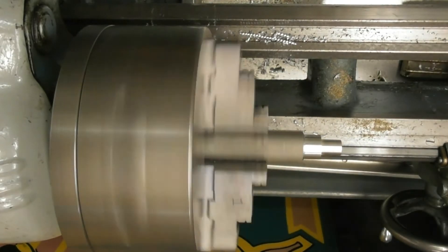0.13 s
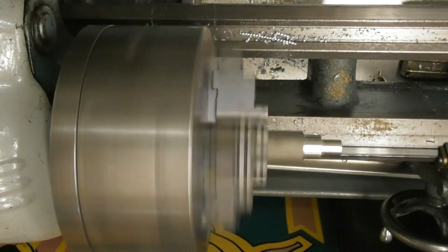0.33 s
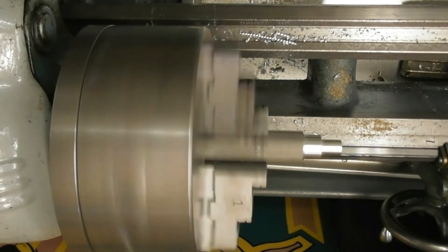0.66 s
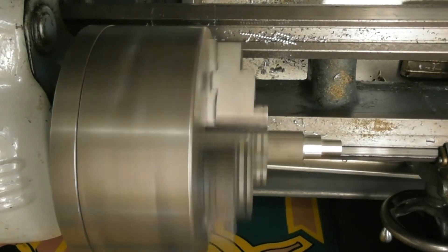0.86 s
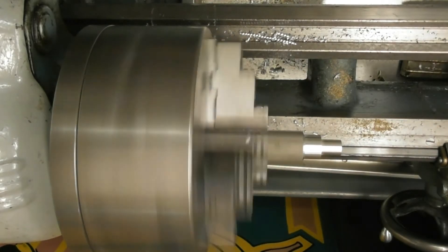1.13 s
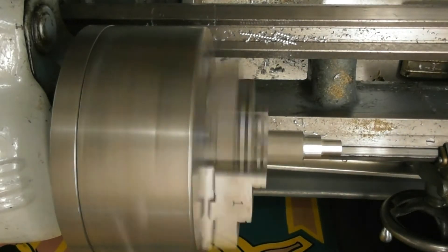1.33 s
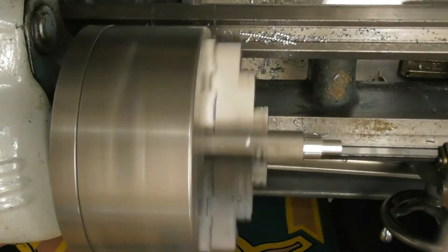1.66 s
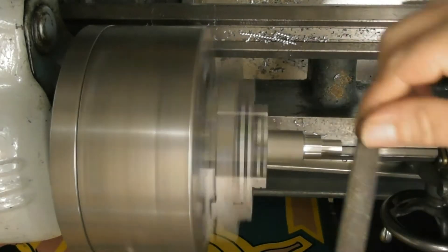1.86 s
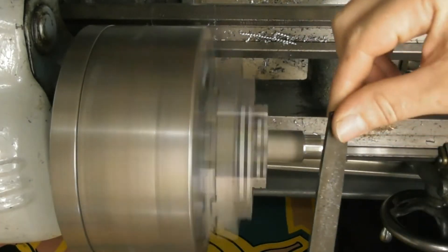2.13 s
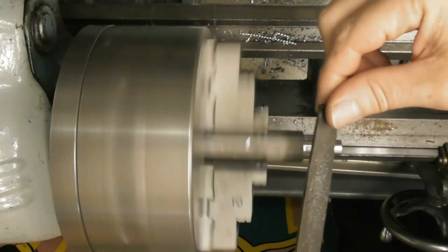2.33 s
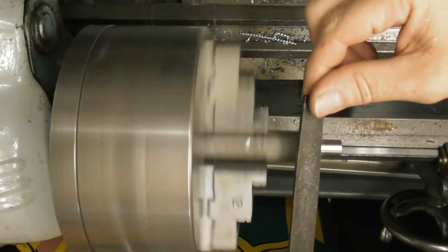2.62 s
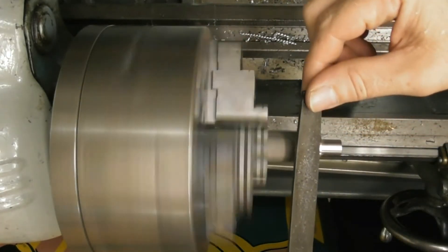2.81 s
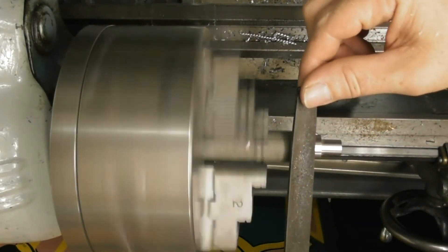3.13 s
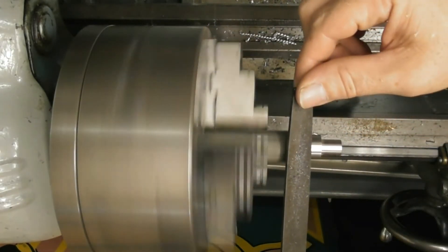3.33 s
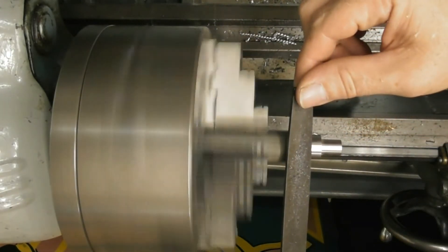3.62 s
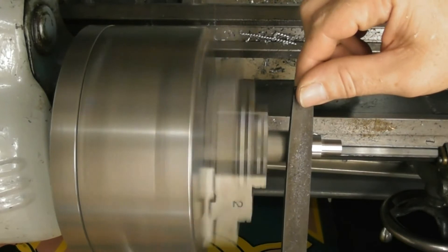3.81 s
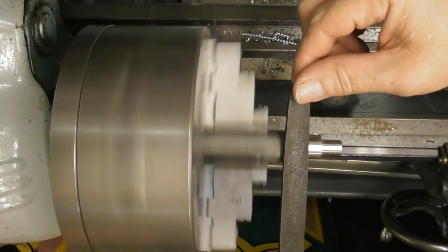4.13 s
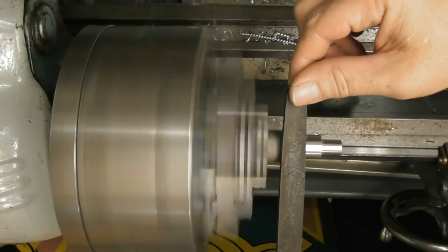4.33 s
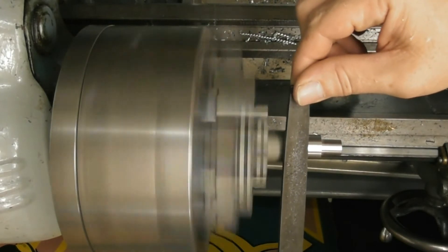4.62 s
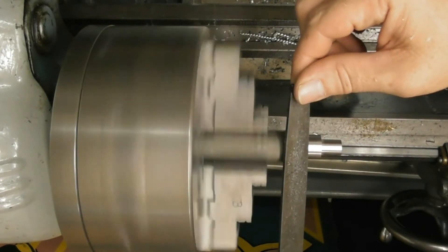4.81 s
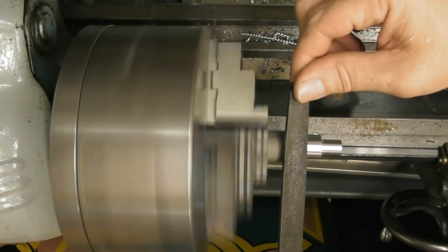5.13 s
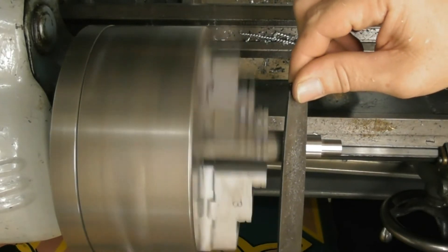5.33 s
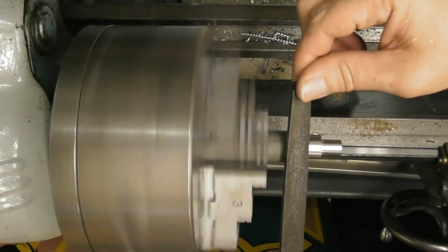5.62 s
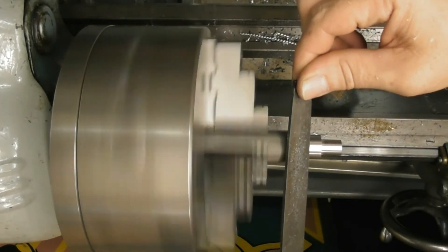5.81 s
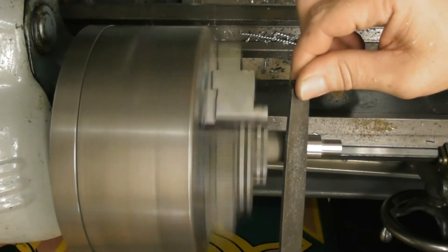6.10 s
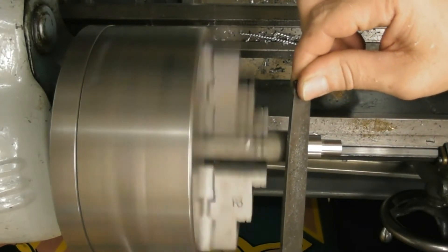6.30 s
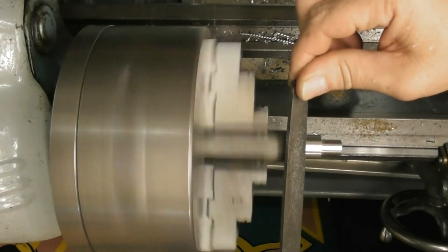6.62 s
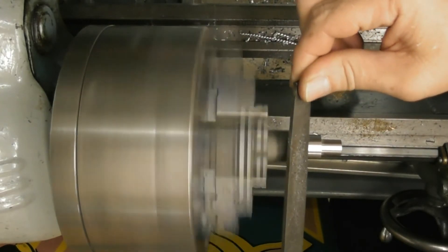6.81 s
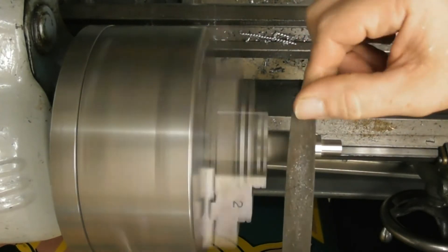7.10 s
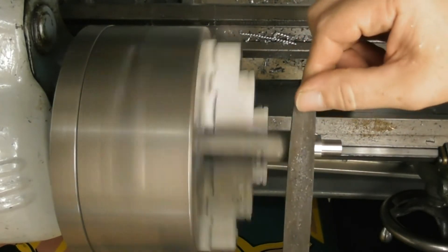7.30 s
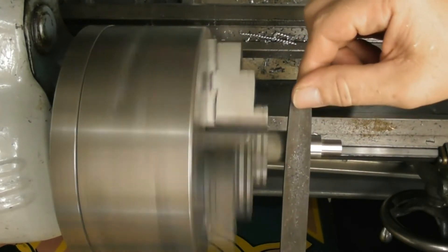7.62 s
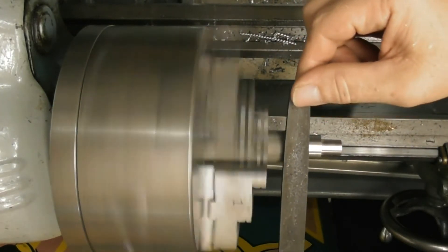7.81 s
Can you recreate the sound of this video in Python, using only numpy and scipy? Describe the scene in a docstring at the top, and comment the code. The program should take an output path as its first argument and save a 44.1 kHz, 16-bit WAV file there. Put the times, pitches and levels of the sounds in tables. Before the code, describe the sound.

Steady low lathe hum with faint soft swishes at first; midway a file rasps and pings rapidly on spinning metal, stops, then touches again.

```python
"""A hand file is laid on work spinning in a metal lathe, lifted and laid on again: each high spot bites into the
teeth, makes the blade ping and drags a short rasp behind it, early or late as the hand sways. Bursts and uneven
noise excite resonators that stand for blade and work. Below runs the lathe: a throbbing mains hum and gear whine
made of sines, and bearing noise made of filtered noise. A few soft swishes of coloured noise come from beside it."""
import sys
import numpy as np
from scipy import signal
from scipy.fft import rfft, irfft, next_fast_len
from scipy.io import wavfile
from scipy.ndimage import uniform_filter1d, map_coordinates

SR = 44100
rng = np.random.default_rng(int(sys.argv[2]) if len(sys.argv) > 2 else 0)


def digitize_waveform(pressure):
    """Quantize a signal to 16-bit integers and store it at the path in sys.argv[1].

    Rows of a 2-D input are taken as channels; values are limited to [-1, 1].
    """
    field = np.atleast_2d(pressure).T
    bounded = np.clip(field, -1, 1)
    quanta = np.round(bounded * 32767).astype(np.int16)
    wavfile.write(sys.argv[1], SR, quanta)


N = 350595

MAINS_HUM_HZ = 120.03
BITE_HZ = 45.45  # passes of a high spot under the file each second


def undb(db):
    """Amplitude ratio of a level in decibels."""
    return 10 ** (np.asarray(db) / 20)


def unit(x):
    """Normalisation to a root mean square of 1."""
    return x / np.sqrt(np.mean(np.abs(x) ** 2) + 1e-20)


def clock():
    """Sampling instants in seconds."""
    return np.arange(N) / SR


def curves(table):
    """Linear interpolation in time of each column of a table."""
    times_s, *columns = np.transpose(table)
    return [np.interp(clock(), times_s, column) for column in columns]


def padded():
    """Even length of the spectra, with half a second to spare for ringing."""
    return next_fast_len(N + SR // 2) // 2 * 2


def bins():
    """Frequency of every spectral bin (Hz), at least 1."""
    return np.maximum(np.arange(padded() // 2 + 1) * SR / padded(), 1)


def over_hz(table, hz):
    """Linear interpolation over log frequency of each column of a table."""
    table_hz, *columns = np.transpose(table)
    return [np.interp(np.log(hz), np.log(table_hz), column) for column in columns]


def colour(table):
    """Minimum-phase response with a given (Hz, dB) outline, by folding the cepstrum onto positive time."""
    cepstrum = irfft(np.log(undb(over_hz(table, bins())[0])))
    half = len(cepstrum) // 2
    cepstrum[1:half] *= 2
    cepstrum[half:] = 0
    return np.exp(rfft(cepstrum))


def resonances(table):
    """Modal superposition of (Hz, width Hz, dB) resonators; each radiates only near its own pitch."""
    f = bins()
    response = 0
    for hz, width_hz, db in table:
        mode = 1 / (1 + 2j * (f - hz) / width_hz)
        radiation = 1 / (1 + 1j * (f - hz) / (4 * width_hz))
        response = response + undb(db) * mode * radiation
    return response


def through(x, response):
    """Linear filtering: the spectrum of the signal times a frequency response."""
    return irfft(rfft(x, padded()) * response)[:N]


def walk(rate):
    """Random modulation of rms 1: levels held for 1 / rate seconds and smoothed twice over that time."""
    hold = max(int(SR / rate), 1)
    steps = np.repeat(rng.standard_normal(N // hold + 1), hold)
    return unit(uniform_filter1d(uniform_filter1d(steps, hold), hold)[:N])


def gate(start, end, fade):
    """Trapezoidal window: 1 between two times, with linear slopes outside them."""
    return np.clip(np.minimum(clock() - start, end - clock()) / fade + 1, 0, 1)


def burst(age, length):
    """Fourth-power exponential pulse: nearly flat within its length, then a quick fall."""
    return np.exp(-(age / length) ** 4)


def grit(spread_db):
    """Impulsive noise of rms 1: dense tooth clicks of very uneven size."""
    return unit(rng.standard_normal(N) * undb(spread_db * walk(5000)))


def bent(x, share):
    """Doppler-like bending: the reading time wavers by a share of the time between passes."""
    shift = share * SR / BITE_HZ * walk(BITE_HZ)
    return map_coordinates(x, [np.arange(N) + shift], order=5, mode="nearest")


def ports(x, scatter_db):
    """Interaural-style level and phase differences at two close microphone ports, plus machine reflections."""
    # the unrelated share is scaled by scatter_db
    # columns: pitch_hz, left_minus_right_db, left_lead_rad, unrelated_share_db
    port_table = [(60.3, 0, 0.1, -16.5), (123, -1.2, 0.057, -27), (223, -1.8, 0.053, -16.5),
                  (367, -4, 0.63, -20), (654, -3.5, 0, -5), (1180, 1, 0.46, -12.5),
                  (2480, 0.5, 0.17, -12.5), (6000, 0, 0, -50), (9000, -0.5, 0.13, -10),
                  (14000, -0.5, 0.6, 1.5)]
    balance_db, lead, apart_db = over_hz(port_table, bins())
    lean = undb(balance_db / 2) * np.exp(.5j * lead)
    echoes = rng.standard_normal(N) * np.exp(-clock() / 0.021)
    side = through(x, unit(rfft(echoes, padded())) * undb(apart_db + scatter_db))
    return np.array([through(x, lean) + side, through(x, 1 / lean) - side])


def workshop(x, t60, wet_db):
    """Diffuse reverberation: an exponentially decaying noise tail, independent at each port."""
    tails = rng.standard_normal((2, N)) * undb(-60 * clock() / t60)
    tails = tails * (clock() > .006)  # no reflection comes sooner
    wet = [through(x, rfft(tail, padded()) / np.sqrt(np.sum(tail ** 2))) for tail in tails]
    return undb(wet_db) * np.array(wet)


def swell(db_per_s):
    """Exponential growth: the level rises steadily in decibels, through 0 dB midway."""
    return undb(db_per_s * (clock() - clock().mean()))


def swishes():
    """Friction noise: light, bright sliding with a fine grain, under envelopes that swell and fade."""
    # columns: peak_s, swelling_s, fading_s, level_db
    slides = [(.025, 0.029, 0.053, -52.5), (.165, 0.06, 0.11, -43), (.37, 0.15, 0.08, -46),
              (.59, 0.013, 0.021, -43.5), (.675, 0.1, 0.12, -37.5), (.832, 0.028, 0.12, -48.5)]
    # spectral outline; columns: pitch_hz, relative_db
    slide_colour = [(1500, -38), (2600, -34), (3700, -13), (4800, -18.5), (6300, -10), (7000, -1.5),
                    (8000, -0.5), (9000, -2.5), (11000, -13.5), (12500, -16), (15800, -26)]
    strength = 0
    for peak, rise, fall, db in slides:
        ramp = np.interp(clock(), [peak - rise, peak, peak + fall], [0, 1, 0])
        strength = strength + undb(db) * np.sin(np.pi / 2 * ramp) ** 2
    return strength * unit(through(grit(spread_db=2.5), colour(slide_colour)))


def bearings():
    """Rolling noise rings the housing: the middle churns with each motor turn, the treble buzzes with the mains."""
    # density of bearings, belt and cabinet before the housing rings; columns: pitch_hz, density_db_per_hz
    drive = [(30, -82), (70, -74), (115, -56.5), (165, -64.5), (300, -65.5), (560, -70), (700, -77.5),
             (1150, -76), (1600, -85), (3000, -87.5), (5000, -99), (7000, -92.5), (9200, -97),
             (11500, -107.5), (15500, -114)]
    # headstock and guard resonances, relative to that density; columns: pitch_hz, width_hz, lift_db
    housing = [(224, 3.7, -20.5), (275, 6.1, 1), (1986, 360, -7.5), (3140, 80, -2), (3890, 380, -6),
               (5280, 40, 3.5), (9100, 72, -1), (14100, 170, -3)]
    motor_hz = 29.81
    t, f = clock(), bins()
    churn = 1 + 0.17 * np.sin(2 * np.pi * motor_hz * t) + 0.038 * np.sin(2 * np.pi * 2 * motor_hz * t)
    buzz = 1 + 0.041 * np.sin(2 * np.pi * MAINS_HUM_HZ * t)
    low_share = 1 / (1 + (f / 1100) ** 4)  # share of the power
    body = colour(drive) * (1 + resonances(housing)) * np.sqrt(SR / 2)
    low_noise = rng.standard_normal(N) * churn * undb(.8 * walk(8))
    low = through(low_noise, body * np.sqrt(low_share))
    high_noise = rng.standard_normal(N) * buzz * undb(0.41 * walk(2.48))
    high = through(high_noise, body * np.sqrt(1 - low_share))
    return low * swell(db_per_s=0.23) + high * swell(db_per_s=0.44)


def tone(hz, db, waver, flutter_db):
    """Sinusoid with slight random phase modulation (radians) and level modulation (dB)."""
    phase = 2 * np.pi * (hz * clock() + rng.random()) + waver * walk(6)
    return np.sqrt(2) * undb(db + flutter_db * walk(9)) * np.sin(phase)


def gears():
    """Tooth-mesh tones and interference: two loud meshes and a slow beat over the drive's many weaker tones."""
    # loud gear meshes, lower and upper: mesh_hz, full level_db, start_db relative to it
    mesh_hz, mesh_db, mesh_start_db = (1044.15, 1311.65), (-51, -48), (-10, -2.5)
    # a gear tone, then the third mains harmonic; columns: pitch_hz, relative_db
    beating = [(357.72, -48), (360.09, -46.5)]
    # weaker tones of motor and gear train; columns: pitch_hz, relative_db
    weak_tones = [(135.97, -46.5), (143.44, -46), (149.83, -47), (179.67, -48), (210.26, -56),
                  (240.06, -53.5), (450.35, -62), (480.12, -58.5), (509.96, -55.5), (600.15, -56.5),
                  (715.43, -61.5), (809, -66.5), (953.92, -64), (1071.57, -66), (1430.91, -62.5)]
    mesh_full_s, beat_null_s = 1.9, .245  # meshes at full strength; first cancelling of the beat
    early = np.clip(1 - clock() / mesh_full_s, 0, 1)
    lower_db, upper_db = (db + start_db * np.sqrt(early) for db, start_db in zip(mesh_db, mesh_start_db))
    lower = tone(mesh_hz[0], lower_db, waver=0.3, flutter_db=0.6)
    upper = tone(mesh_hz[1], upper_db, waver=0.052, flutter_db=0.75)
    gear, mains = (undb(db + 0.24 * walk(15)) * np.sin(2 * np.pi * hz * (clock() - beat_null_s))
                   for hz, db in beating)
    beat = np.sqrt(2) * undb(-0.1) * (mains - gear)
    weaker = sum(tone(hz, db + 1.4, waver=0.4, flutter_db=2.5) for hz, db in weak_tones)
    return swell(db_per_s=0.23) * (lower + upper + beat + weaker)


def hum():
    """Magnetic hum under amplitude and phase modulation: the sway of each shaft pinches it once a turn."""
    # unbalanced shafts, main then second; columns: turns_per_s, trough_s
    shafts = [(7.959, .068), (7.444, .099)]
    level_db = -18.5  # rms before the throb, midway through
    main, second = (2 * np.pi * hz * (clock() - trough) for hz, trough in shafts)
    throb = 1 - 0.17 * np.cos(main) - 0.024 * np.cos(2 * main) - .055 * np.cos(second)
    phase = 2 * np.pi * MAINS_HUM_HZ * clock() + 0.16 * np.cos(main) + 0.03 * walk(5.2)
    return np.sqrt(2) * undb(level_db) * swell(db_per_s=0.1149) * throb * np.sin(phase)


def contact():
    """Intermittent contact: whether the file touches, how loosely it lies (0-1), and its rasp (dB)."""
    # columns: laid_on_s, lifted_s, rasp_relative_db
    strokes = np.array([(4.077, 6.725, -41), (7.684, 8.2, -42.5)])
    settle_s, lift_s = 0.13, 0.054
    t = clock()
    midway = (strokes[:-1, 1] + strokes[1:, 0]) / 2  # between one stroke and the next
    start, end, rasp_db = strokes[np.searchsorted(midway, t)].T
    settling = np.exp(-((t - start) / settle_s) ** 4)
    lifting = np.exp(-((t - end) / lift_s) ** 2)
    return gate(start, end, fade=0.0049), np.maximum(settling, lifting), rasp_db


def catches(count):
    """Uneven cutting force: extra bite and extra ping (dB) of the pass that each sample belongs to."""
    # passes with their own catch of the teeth; columns: pass_s, extra_bite_db, extra_ping_db
    caught = [(4.247, 7, -9), (4.269, 9, -2), (4.357, 11.5, 11), (4.423, 6, 0), (4.467, 11.5, 7),
              (4.489, 2, 3), (4.511, 9, -3), (4.533, -1, 2), (4.643, 9.5, 0), (4.709, 3, 0), (4.731, 9, 0),
              (4.753, 9.5, -5), (4.775, 9, -2), (4.797, 8, 1), (4.841, 13, -3), (4.951, 4, 3),
              (4.973, 11, 0), (4.995, 13.5, 0), (5.017, 11, 2), (5.039, 10, -13), (5.281, 10.5, -1),
              (5.303, 13, 3), (5.347, 8.5, 5), (5.611, 1, -8), (5.633, 8.5, -4), (5.743, 3, 0),
              (6.424, 3, -7), (6.492, 1.5, -3), (6.514, 0, 2.5), (6.536, 2.5, -1), (6.58, 3, 1),
              (6.602, 0.5, 0), (6.647, 2, 2), (7.685, 4.5, 0.5), (7.75, 4.5, 2), (7.793, 5.5, 6.5),
              (7.815, 4, 0), (7.947, 1.5, -1)]
    extra = np.zeros((count.max() + 2, 2))
    for s, bite_db, ping_db in caught:
        extra[round(s * BITE_HZ) + 1] = bite_db, ping_db
    return extra[count].T


def blade_ring(bite, rasp):
    """Forced modal vibration: bites and rasp ring the blade, and each hold lifts its modes by its own amounts."""
    # modes, with the lift over the cutting colour in each hold
    # columns: pitch_hz, width_hz, light_filing_db, leaning_in_db, second_stroke_db
    modes = np.array([(2430, 160, -3.5, -2, -7), (2980, 150, 6, 2, 3), (3546, 130, 5.5, 1.5, 6),
                      (3810, 430, 4, 6.5, 1.5), (4450, 210, -2, 2, -5), (5270, 94, -3.5, -4, -9),
                      (6990, 33, 9.5, 8.5, 10), (7434, 200, 11.5, 11, 5.5), (7720, 96, 11.5, 11.5, -6),
                      (8270, 280, 2.5, 2, 1), (8760, 170, 3.5, -4, 5), (8980, 140, 5, 4.5, 5.5),
                      (10360, 230, 4, 4, -5), (11630, 350, 3.5, -6, 8), (12900, 170, 13.5, 10, 11),
                      (14300, 540, 0, 1, 5), (15650, 180, 14, 11, 17)])
    # broad colours of the cutting teeth; columns: pitch_hz, relative_db
    bite_outline = [(600, -17), (1400, -5), (2000, 10), (2700, -1), (3500, 1.5), (4300, -0.5), (4900, -3.5),
                    (6500, 7), (7700, 2), (9500, 0), (10500, -1), (12200, -13.5), (13500, -18),
                    (15000, -29)]
    rasp_outline = [(600, 1), (1400, 2), (2100, 2.5), (2700, 3), (3700, -7), (4800, -7.5), (6200, 1),
                    (7500, -2.5), (9600, 4), (10600, -4.5), (11300, -13), (12300, -18), (13500, -10.5),
                    (15000, -29.5)]
    # the hand changes its hold; columns: leaning_in_s, second_stroke_s
    hold_changes = (6.39, 7.2)
    hold = np.searchsorted(hold_changes, clock())
    bite_colour, rasp_colour = colour(bite_outline), colour(rasp_outline)
    out = 0
    for k in range(len(hold_changes) + 1):
        ringing = 1 + resonances(modes[:, [0, 1, 2 + k]])
        bitten = through(bite * (hold == k), unit(bite_colour * ringing))
        rasped = through(rasp * (hold == k), unit(rasp_colour * ringing))
        out = out + bitten + rasped
    # the point of contact shifts and bends the pitch of the ringing
    return bent(out, share=0.0032)


def pings(count, age, strength):
    """Damped bending mode: it pings at the bite, swells as the teeth let go and is damped before the next pass."""
    ping_hz, bend_share, decay_s, attack_s, damped_s = 2949, .011, 0.0066, 0.00048, 0.02
    let_go_s, let_go_spread_s, let_go = 0.012, 0.0044, 0.67  # after the bite; strength before scatter
    chance = rng.standard_normal((count.max() + 1, 3))[count].T  # one draw for each pass
    release = let_go * undb(4.2 * chance[0]) * np.exp(-((age - let_go_s) / let_go_spread_s) ** 2)
    attack = 1 - np.exp(-age / attack_s)
    shape = (np.exp(-age / decay_s) + release) * attack * burst(age, damped_s)
    phase = 2 * np.pi * np.cumsum(ping_hz * (1 + bend_share * chance[1])) / SR
    ping = unit(shape * np.sin(phase)) * strength * undb(2.5 * chance[2])
    # the pings linger faintly round the machine
    return ping + workshop(ping, t60=.55, wet_db=-9.5).mean(axis=0)


def filing():
    """Periodic excitation: each high spot gives a bite, ping, rasp and rebound that ring blade and work."""
    # the hand bears down, eases off, then leans in hard; the second stroke builds again
    # columns: time_s, bite_db, cut_depth_db, work_shake_db (all relative)
    press = [(4.07, -34, 2.5, -50), (4.2, -34, -0.5, -36), (4.28, -35, -1.5, -40), (4.75, -35, -0.5, -40),
             (5.02, -36.5, 0, -39.5), (5.1, -39, -0.5, -40), (5.35, -34.5, 0, -36.5), (5.8, -34, -1.5, -48),
             (6.1, -42, -2.5, -42), (6.36, -56.5, -2.5, -66), (6.42, -25.5, 2, -39.5),
             (6.53, -27.5, 4.5, -39), (6.62, -22.5, 8, -35), (6.67, -34, 10, -34.5),
             (6.72, -32.5, 9.5, -29.5), (7.68, -37, 11, -29.5), (7.77, -32, 1.5, -34.5),
             (7.8, -36.5, 8.5, -37.5), (7.88, -34, 3, -39.5), (7.95, -29, 2.5, -48)]
    # the hand sways the file, so the high spot meets it earlier or later; columns: time_s, lateness_s
    sway = [(4.07, .003), (4.18, .003), (4.245, -.0002), (4.42, .0012), (4.55, 0), (4.65, .0011), (4.72, 0),
            (4.8, .0007), (4.88, -.0005), (4.98, .0007), (5.1, -.0006), (5.28, -.001), (5.46, .0005),
            (5.52, -.0008), (5.6, .0005), (5.8, .0004), (6.05, -.0008), (6.2, -.0022), (6.37, -.0018),
            (6.42, 0), (6.64, .001), (6.7, .0023), (7.68, .0052), (7.77, .0038), (7.87, .0023),
            (7.95, .0024)]
    # work and chuck shaken by the file; columns: pitch_hz, width_hz, relative_db
    work = [(229, 34, -7), (268.5, 24.7, 9), (325, 24, 2.5), (412, 54, -1), (508, 144, -8), (724, 100, -13)]
    bite_s, drag_s, ride_s = 0.0026, 0.0096, 0.02  # bite length, decay of the rasp, length of rubbing
    rebound_s, rebound_spread_s = 0.0065, 0.0042  # the file springs off and comes down again
    graze = .12  # a riding file touches lightly between rubs
    coarse_hz = 2700

    touch, loose, stroke_db = contact()
    bite_db, depth_db, shake_db = curves(press)
    # a loose file rasps less and shakes the work less
    rasp_db = stroke_db + 0.37 * depth_db - 5.5 * loose
    shake_db = shake_db - 9 * loose
    passes = (clock() - curves(sway)[0]) * BITE_HZ + 1
    count = passes.astype(int)
    age = passes % 1 / BITE_HZ  # time since the last bite
    chance = rng.standard_normal((count.max() + 1, 3))[count].T  # one draw for each pass
    pushes = unit(np.diff(count, prepend=count[0]) * 1.) * touch
    catch_db, ping_db = catches(count)

    # a bite is a small click plus a short burst of breaking chips, harder in a deep cut
    chips = unit(burst(age, bite_s)) * grit(spread_db=3.5) * touch
    impact = undb(-16) * pushes + undb(-19) * chips
    bite = impact * undb(bite_db + catch_db + 0.16 * depth_db + 0.51 * chance[0])

    # a file that bites little rides on the work, so its rasp starts softly and lasts longer
    riding = 1 / (1 + undb(bite_db - rasp_db + 5.0))
    rebound = 0.15 * np.exp(-((age - rebound_s) / rebound_spread_s) ** 2)
    struck = unit(np.exp(-age / drag_s) * burst(age, ride_s) + rebound)
    ridden = unit(burst(age, ride_s) * (1 - np.exp(-age / 0.0026)) + rebound + graze)
    drag = ((1 - riding) * struck + riding * ridden) * undb(1.9 * walk(350))
    teeth = drag * grit(spread_db=1.5) * touch
    blade = blade_ring(bite, teeth * undb(rasp_db + 0.65 * chance[1]))

    # a deeper cut takes bigger chips, which sound lower
    coarse = through(blade, np.exp(-np.log(bins() / coarse_hz) ** 2 / 0.46))
    blade = blade + coarse * (undb(0.75 * depth_db) - 1)
    blade = blade + pings(count, age, touch * undb(-48.5 + depth_db + ping_db))

    # the beat of the bites and the roughness of the teeth drive the heavy parts
    force = pushes * undb(.7 * chance[2]) + undb(-10) * teeth
    shaken = through(force * undb(shake_db), unit(resonances(work)))
    return blade + shaken


def scene():
    """Superposition of the running lathe, the file on it and the swishes beside it."""
    file = filing()
    machine = ports(hum() + gears(), scatter_db=-14.0) + ports(bearings(), scatter_db=0.0)
    filed = ports(file, scatter_db=-5.5) + workshop(file, t60=0.23, wet_db=-14.5)
    return machine + filed + ports(swishes(), scatter_db=4.5)


def record(dry):
    """Band limiting: the recorder cuts the top with a steep elliptic low-pass at 15900 Hz."""
    return signal.sosfilt(signal.ellip(10, .2, 80, 15900, fs=SR, output="sos"), dry)


dry = scene()
out = record(dry)
digitize_waveform(out)
```